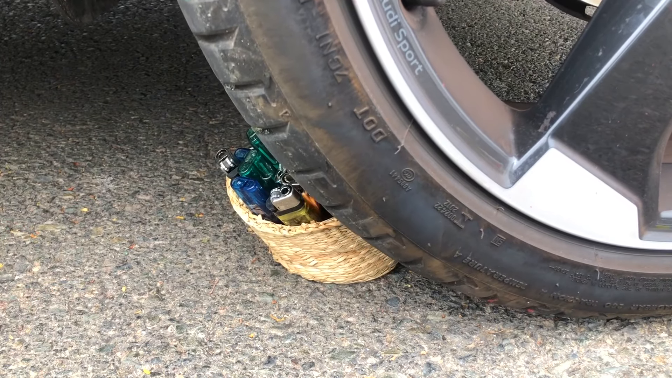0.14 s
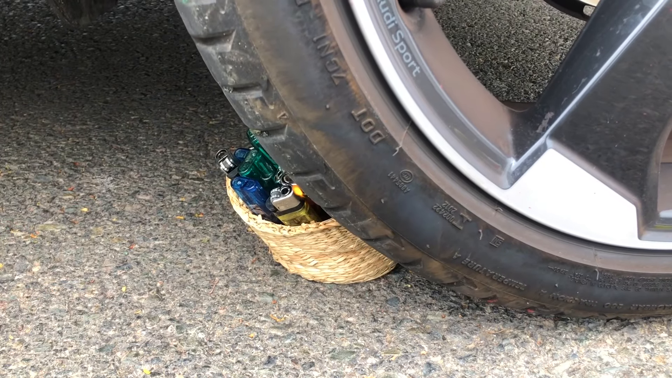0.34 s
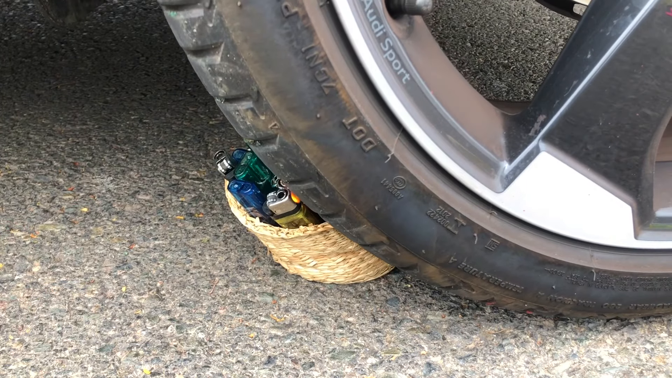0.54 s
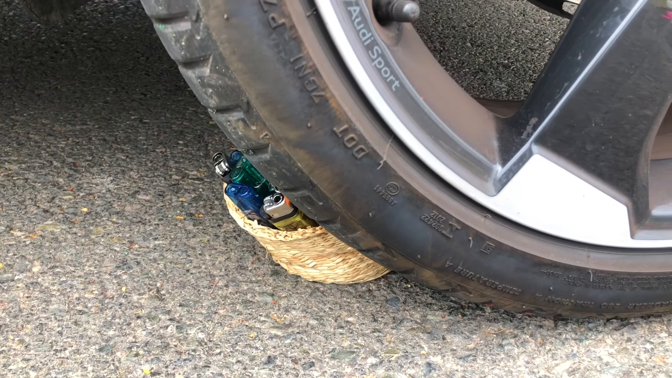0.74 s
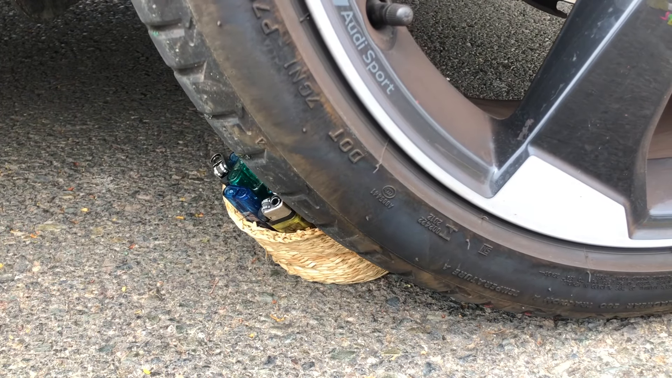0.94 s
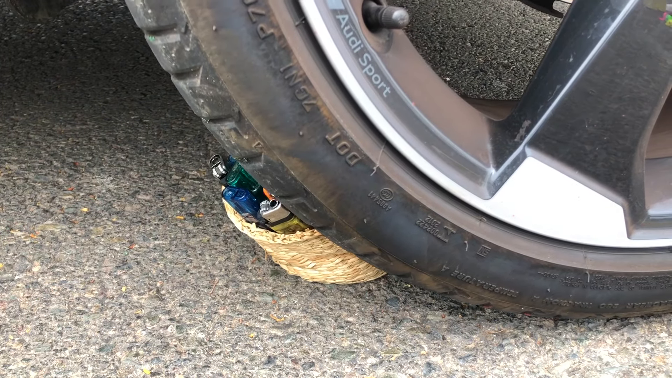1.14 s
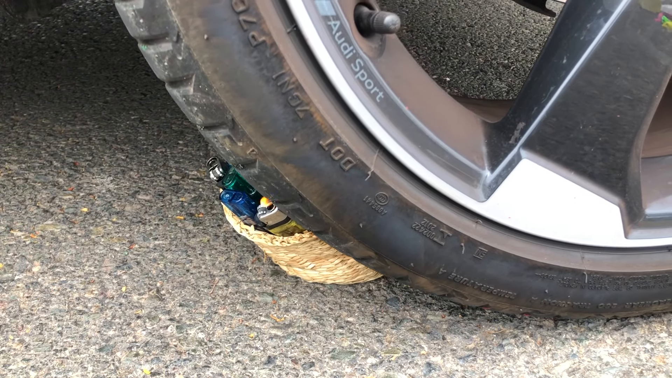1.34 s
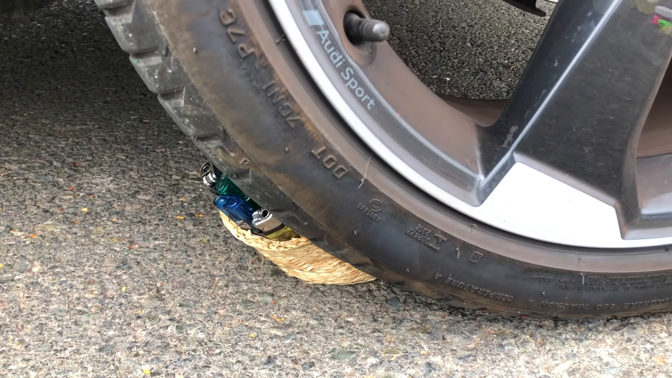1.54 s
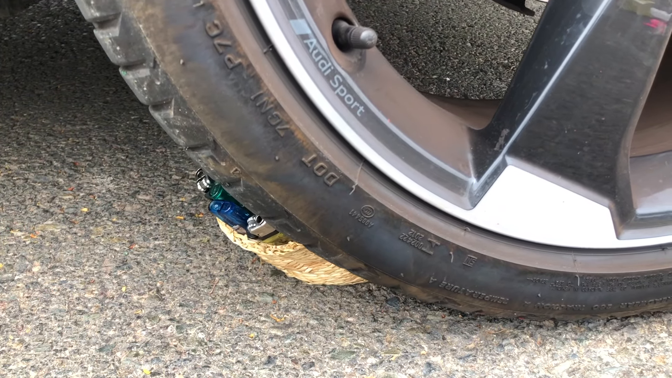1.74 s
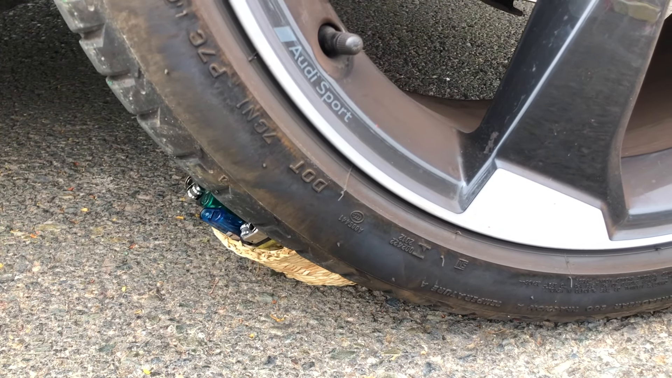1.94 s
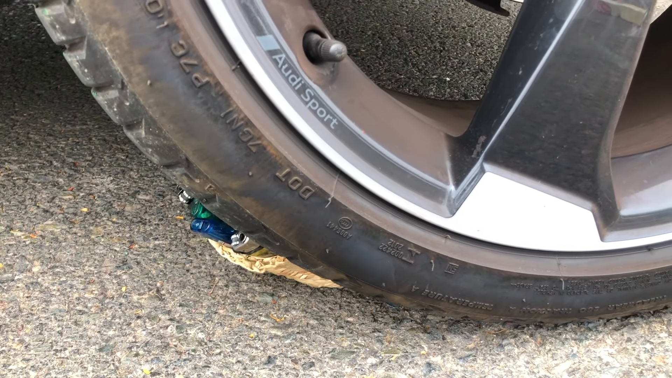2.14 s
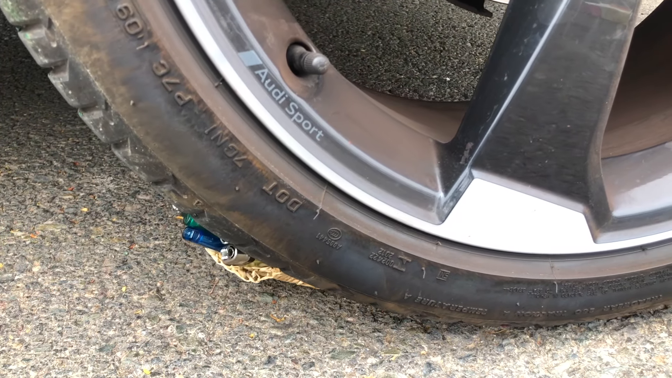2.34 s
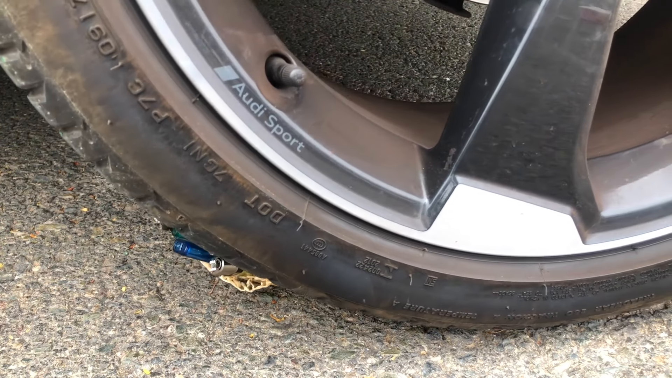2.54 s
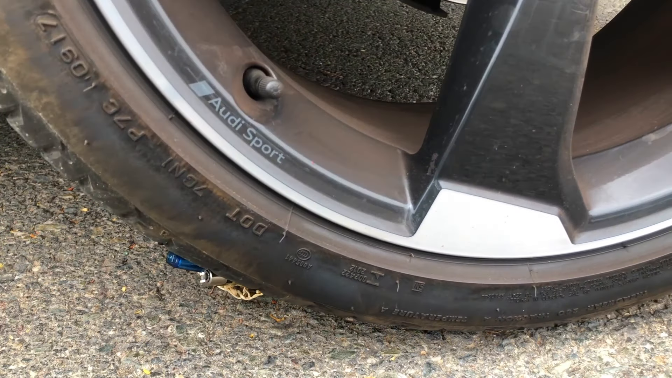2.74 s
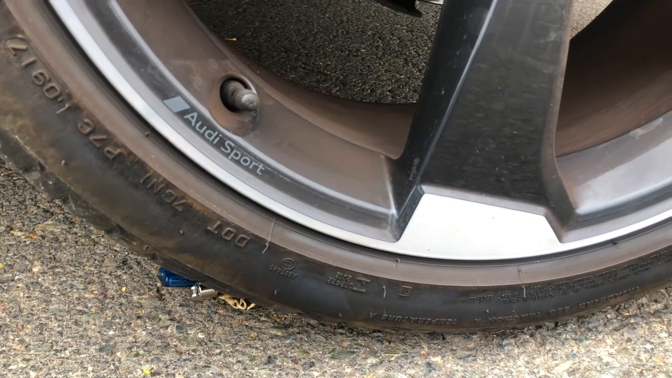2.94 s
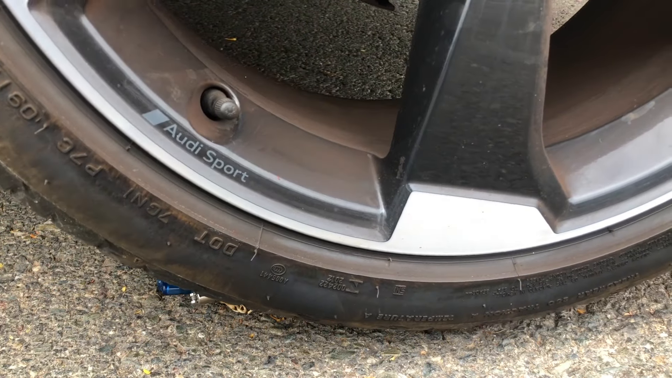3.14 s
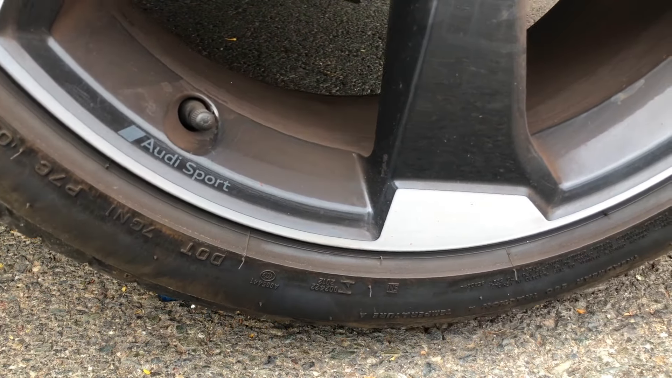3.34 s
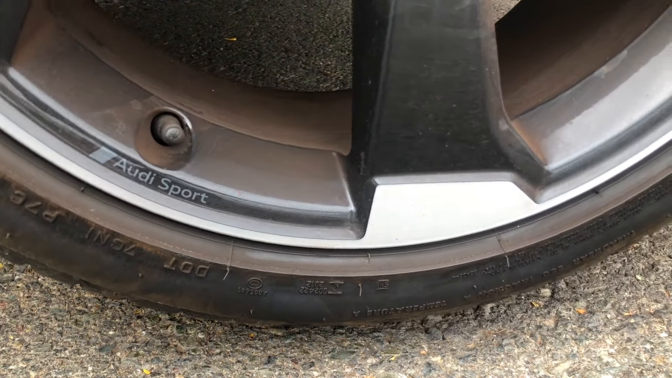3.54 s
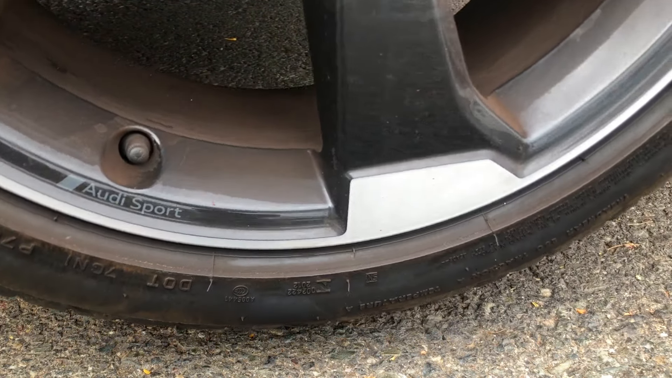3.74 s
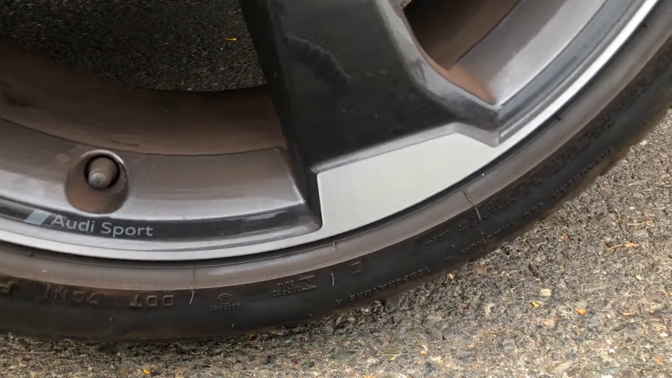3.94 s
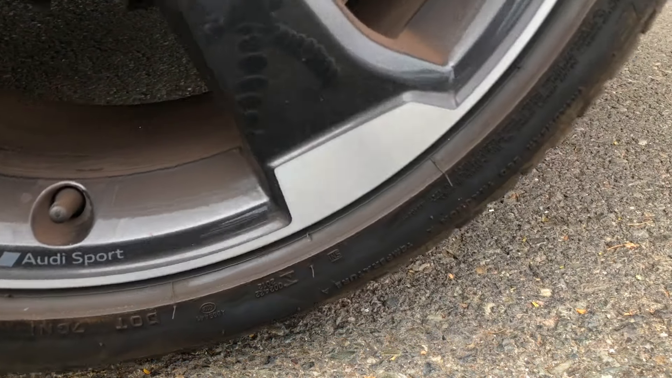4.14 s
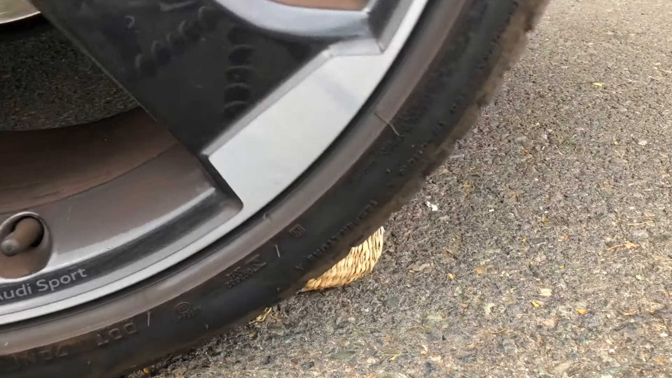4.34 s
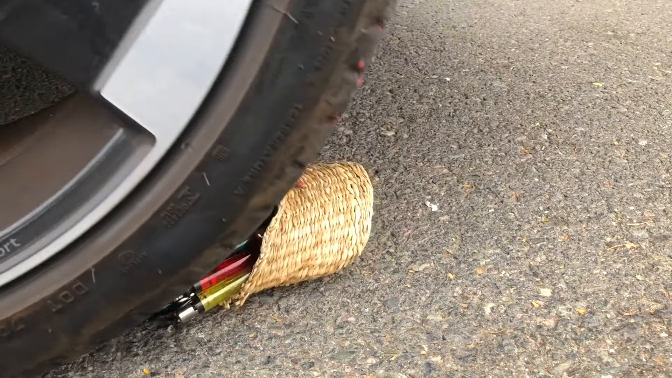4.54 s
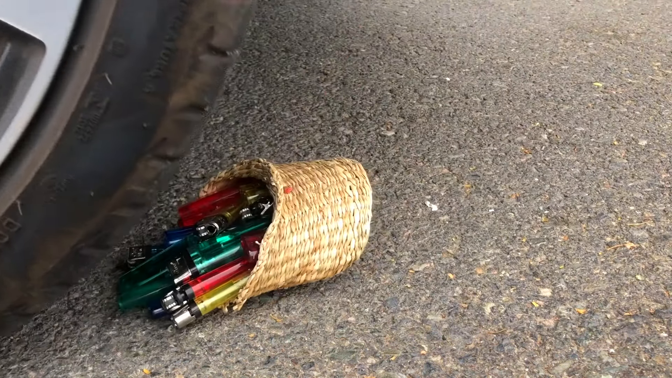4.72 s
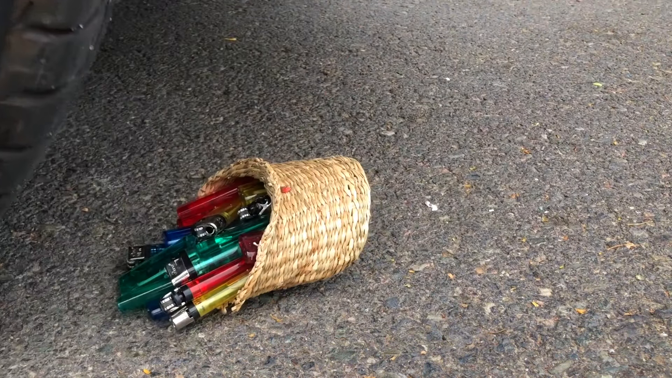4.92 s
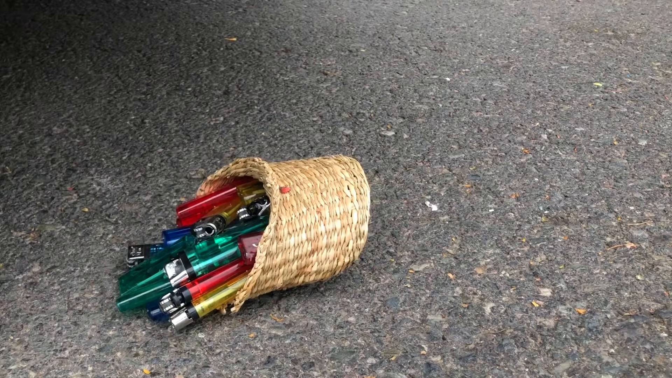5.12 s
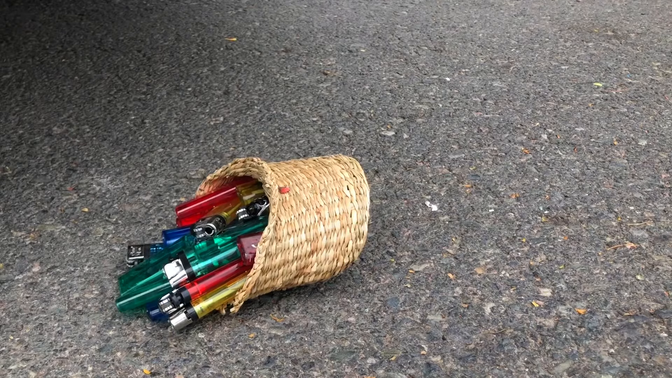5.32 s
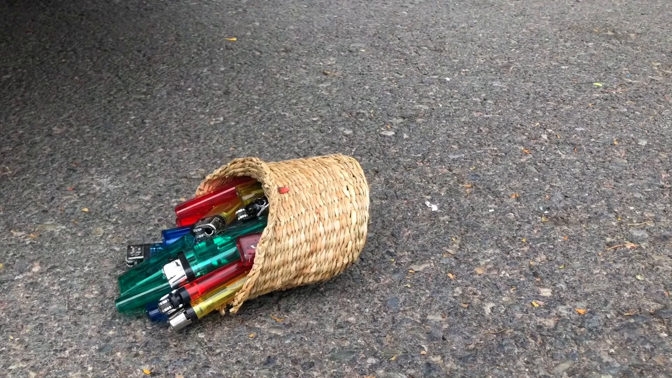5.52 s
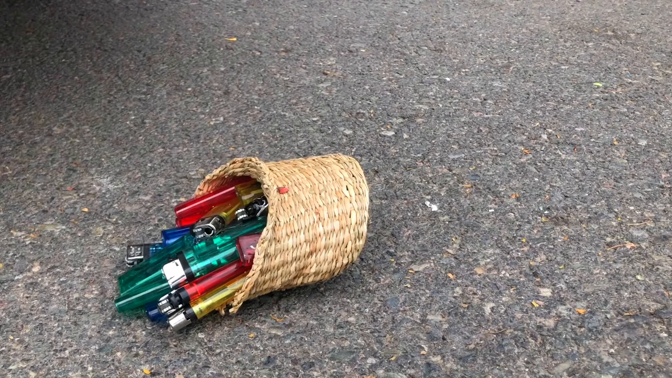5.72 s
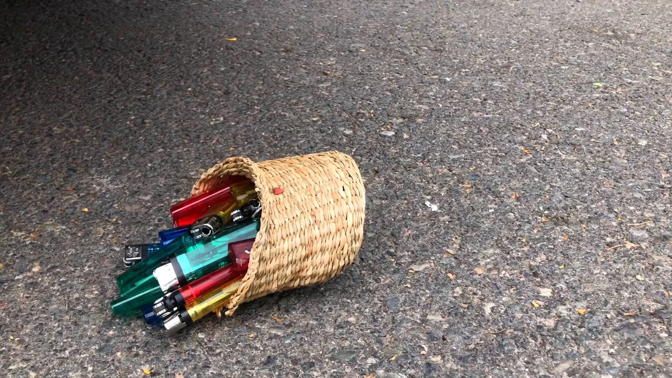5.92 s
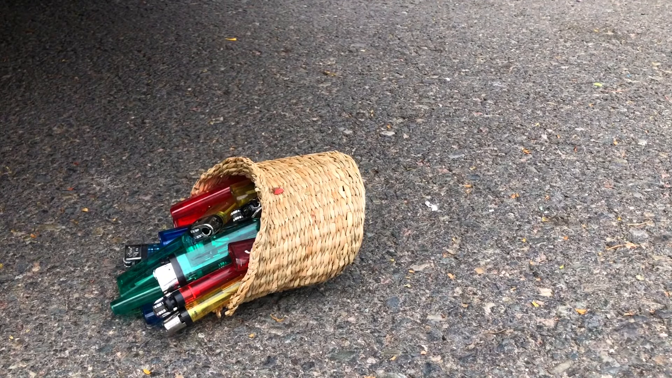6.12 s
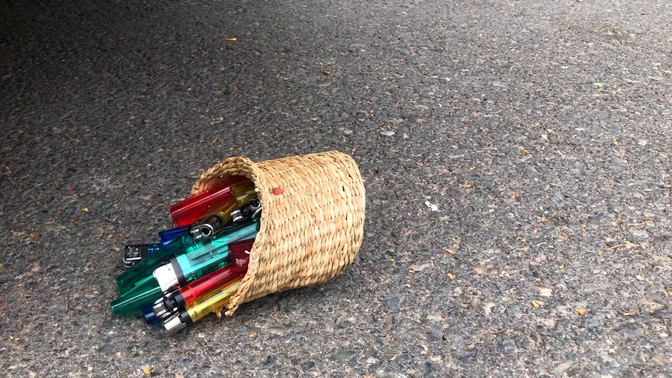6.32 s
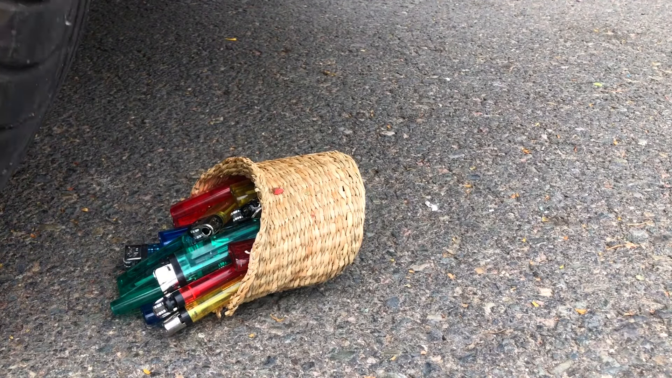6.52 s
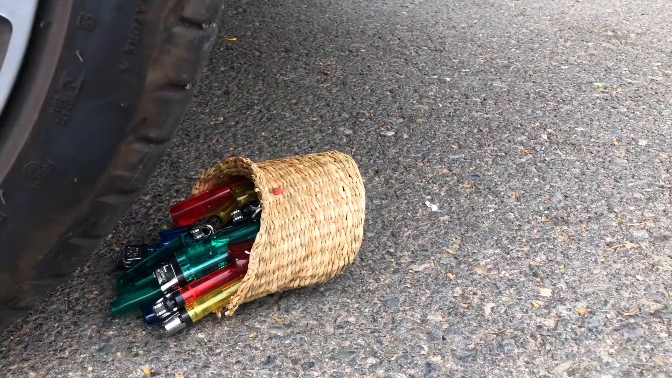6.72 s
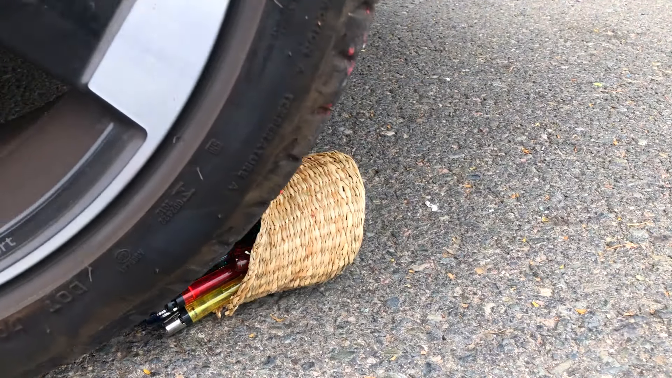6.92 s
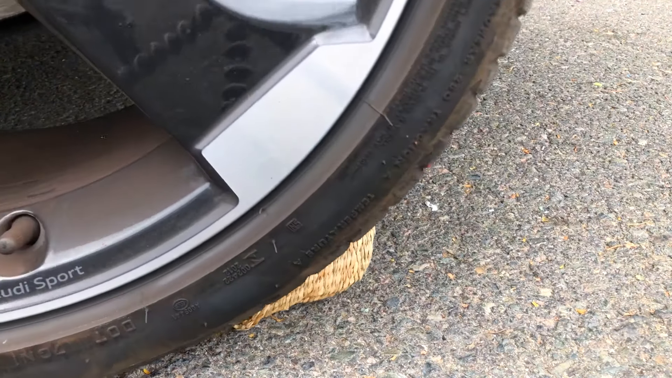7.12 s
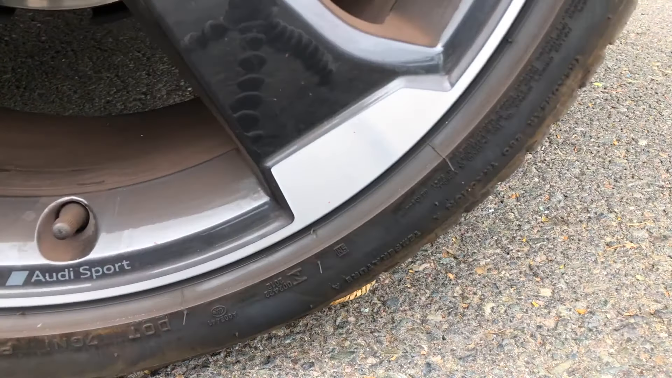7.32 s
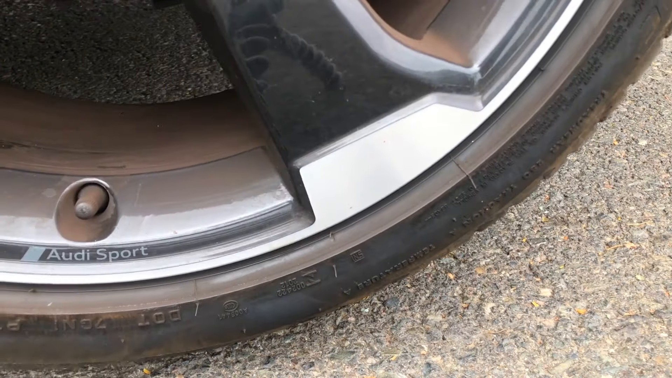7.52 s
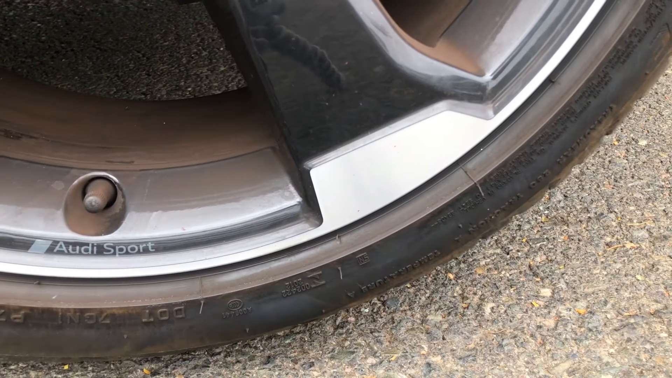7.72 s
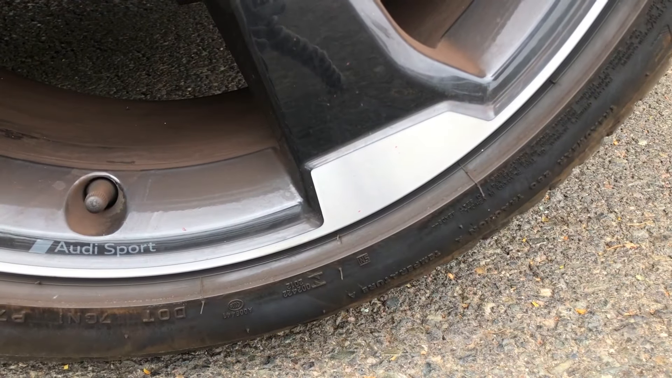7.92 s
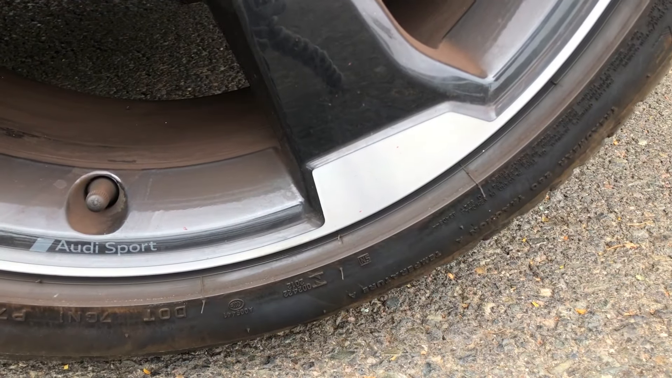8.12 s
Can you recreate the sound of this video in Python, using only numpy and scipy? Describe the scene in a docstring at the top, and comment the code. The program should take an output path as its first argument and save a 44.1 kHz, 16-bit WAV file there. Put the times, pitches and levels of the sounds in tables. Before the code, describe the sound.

A car tyre rolls slowly over a wicker basket of plastic lighters, with sharp cracks and dense crunching over a low engine, then backs on again.

```python
"""An engine idles under a faint street hiss, then revs as the car creeps over a wicker basket of plastic
lighters on asphalt; it rolls clear, then backs onto the pile again.
Engine: wavering firing orders plus coloured noise. Crushing: random splinter bursts and small falling knocks.
Cracks: placed noise snaps and knocks falling in pitch. Lurches: low noise shudders; wheel modes ring when jarred."""
import sys
import numpy as np
from scipy import signal
from scipy.io import wavfile

SR = 44100
rng = np.random.default_rng(int(sys.argv[2]) if len(sys.argv) > 2 else 0)


def dump(signal):
    """Clip the signal to [-1, 1] and save it as 16-bit WAV at the path in sys.argv[1]."""
    limited = np.clip(np.atleast_2d(signal).T, -1, 1)
    pcm = np.round(limited * 32767).astype(np.int16)
    wavfile.write(sys.argv[1], SR, pcm)


N = 364707

# engine course: t/s, firing cycle f/Hz, tone level/dB, rumble level/dB, hiss level/dB
ENGINE_COURSE = [(0, 29.8, -49, -51.5, -48.5), (.5, 35.98, -51.5, -42, -48.5),
                 (.95, 42.8, -48.5, -41.5, -46), (1.9, 44, -41.5, -42.5, -46.5),
                 (2.5, 44.16, -53.5, -42, -67), (3.1, 35.47, -47, -46.5, -55), (4.0, 31.37, -42, -37, -48),
                 (4.95, 33.15, -53, -54.5, -62.5), (5.7, 30.7, -56, -66.5, -70.5),
                 (5.9, 31.9, -52.5, -66, -69), (6.7, 28.52, -60, -49.5, -57.5),
                 (7.2, 31.13, -50, -42.5, -65), (7.95, 28.2, -52.5, -80, -59),
                 (8.27, 24.9, -68, -50.5, -58)]
# firing orders: multiple of the firing cycle, level/dB
FIRING_ORDERS = [(1, -26), (2, -3.5), (3, -2), (4, -9), (5, -8), (6, -17)]
# engine rumble spectrum: f/Hz, relative level per Hz/dB
RUMBLE_SPECTRUM = [(22, -26), (43, -5.5), (66, 1), (123, -4), (200, -5.5), (1500, -35.5)]
# fan and street hiss spectrum: f/Hz, relative level per Hz/dB
HISS_SPECTRUM = [(300, 2), (800, -8), (2000, -12), (5000, -14.5), (9000, -23), (18000, -21)]
# steady crackle under tread pressure: t/s, splinter level/dB, wicker crunch level/dB
PRESSURE_COURSE = [(0.5, -61, -54), (1.2, -54.5, -54), (1.6, -40.5, -44.5), (2.2, -46, -46),
                   (2.75, -39, -48.5), (3.05, -54.5, -45), (3.4, -46.5, -51), (3.7, -49, -38),
                   (4.75, -41.5, -44.5), (4.93, -48, -48.5), (5.05, -93, -72), (6.38, -81, -66.5),
                   (6.55, -62, -50), (6.95, -48.5, -53), (7.2, -44.5, -36), (7.38, -53, -57),
                   (7.95, -65, -65), (8.12, -72, -63)]
# partial collapses of the pile: start t/s, length/s, splinter level/dB, crunch level at 1 kHz/dB,
# crunch tilt/(dB per octave)
COLLAPSE_EVENTS = [(1.455, 0.016, -42, -25, 9), (1.694, 0.11, -36.5, -41.5, 7.5),
                   (1.981, 0.15, -36.5, -39.5, -1.5), (2.132, 0.072, -31, -36, 7.5),
                   (2.392, 0.085, -36, -38.5, 1), (2.516, 0.15, -38.5, -45.5, 8),
                   (2.855, 0.045, -30, -32.5, 5), (3.147, 0.047, -30.5, -38, -6.5),
                   (3.436, 0.04, -32, -39.5, -1), (3.507, 0.027, -34.5, -33.5, -6),
                   (3.575, 0.038, -34.5, -47.5, -23), (3.697, 0.088, -33.5, -87, 4.5),
                   (3.93, 0.1, -33, -32, 3), (4.086, 0.29, -49.5, -38, 1.5),
                   (4.439, 0.12, -32, -44.5, 14.5), (4.625, 0.079, -37, -55, -5),
                   (6.715, 0.093, -55, -48.5, 8), (7.145, 0.046, -49, -55, 20.5),
                   (7.293, 0.04, -49, -27, 3), (7.934, 0.043, -34.5, -35, -2)]
# plastic splinter spectrum: f/Hz, relative level per Hz/dB
SPLINTER_SPECTRUM = [(1000, -41), (2500, -4), (6300, 4.5), (10000, 2), (18000, 1)]
# clearest single cracks: t/s, snap level/dB, knock level/dB, knock f/Hz
CRACK_EVENTS = [(0.5479, -17, -13.5, 960), (0.5693, -22.5, -18, 750), (0.6299, -28, -21.5, 950),
                (0.7083, -20.5, -47, 600.0), (0.838, -23.5, -29, 1350), (0.8605, -17, -15, 745),
                (0.9296, -27.5, -33, 1500.0), (1.1182, -33, -50, 786), (1.151, -33, -40.5, 630.0),
                (1.2475, -29, -41, 630.0), (1.2588, -16, -24.5, 1200), (1.314, -13.5, -14, 1600),
                (1.3985, -14.5, -29.5, 832), (1.4037, -19, -32, 1420), (1.414, -15, -17.5, 1600),
                (1.467, -7, -14.5, 610), (1.4856, -19, -10.5, 1160), (1.52, -10.5, -12.5, 784),
                (1.5574, -13, -20, 1600), (1.6278, -17, -17.5, 651), (1.6364, -18, -19, 760),
                (1.6959, -13, -8, 1160), (1.7368, -13.5, -24, 1120.0), (1.7506, -16, -14.5, 653),
                (1.7653, -15.5, -30, 1300.0), (1.773, -14.5, -19, 1230.0), (1.7792, -19.5, -15, 930.0),
                (1.7992, -25.5, -11, 1600), (1.808, -19.5, -28.5, 1730.0), (1.8232, -13.5, -19, 684),
                (1.8556, -11.5, -13, 1550), (1.9131, -12, -17.5, 750), (1.929, -26, -19, 1350),
                (1.998, -14, -16.5, 684), (2.008, -15.5, -22.5, 730.0), (2.022, -25, -14, 820),
                (2.048, -10, -16, 675), (2.0912, -16.5, -26, 772), (2.123, -18, -30, 885),
                (2.164, -21, -9.5, 1370), (2.206, -17.5, -14, 790), (2.271, -21.5, -29, 660),
                (2.3365, -20, -22.5, 640), (2.3998, -27, -25, 805), (2.414, -17, -14.5, 1550),
                (2.488, -18.5, -33, 690.0), (2.511, -28, -13, 1180), (2.5569, -17, -22.6, 655),
                (2.5639, -25, -13, 800), (2.65, -27, -19.5, 770), (2.6911, -28.5, -23, 730.0),
                (2.7315, -30, -20, 1170), (2.7671, -23, -22.5, 804), (2.8214, -23, -16, 618),
                (2.8399, -18, -18, 860), (2.8526, -22, -22, 880.0), (2.8656, -25, -12.5, 980),
                (2.8783, -13, -8, 830), (2.8954, -24, -10.5, 900), (2.9139, -33, -16.5, 845),
                (2.931, -35, -21, 850), (2.9406, -23.5, -19, 634), (2.954, -25, -20, 840),
                (2.9707, -24, -26, 1210), (2.9757, -39, -20.5, 890), (3.0042, -39.5, -22, 720),
                (3.039, -36.5, -21.5, 635), (3.0745, -34, -20, 623), (3.1022, -32, -23, 865),
                (3.1265, -16.5, -27, 760), (3.167, -20, -18.5, 740), (3.2101, -22.5, -10, 840.0),
                (3.2531, -26, -20, 770), (3.301, -25, -16.5, 624), (3.3918, -25, -15.5, 714),
                (3.447, -31, -12, 990), (3.4508, -17.5, -15.5, 800), (3.5093, -15.5, -11.5, 790),
                (3.5418, -21.5, -20, 596), (3.5855, -11, -8.5, 785), (3.6197, -19, -29, 1020.0),
                (3.646, -18, -15.5, 830), (3.6771, -18.5, -18.5, 1280), (3.7, -28, -19, 820),
                (3.7407, -17.5, -29, 730.0), (3.7564, -27, -17.5, 870), (3.7794, -21, -20, 872),
                (3.8036, -18.5, -15, 930.0), (3.8543, -15.5, -11.5, 1680), (3.869, -20, -32.6, 1570.0),
                (3.9012, -22.5, -22, 1080), (3.909, -13, -9.5, 800), (3.9412, -19, -12.5, 890),
                (3.945, -25.5, -16, 670), (3.9648, -15, -33, 690.0), (3.986, -14, -15, 604),
                (4.1053, -21, -13.5, 600.0), (4.1277, -22, -3, 1310), (4.1443, -23, -13, 925),
                (4.1687, -18.5, -10, 1210), (4.1823, -21, -20, 900), (4.1856, -22, -17, 1100),
                (4.199, -33, -19, 1300), (4.1916, -24, -12, 605), (4.213, -22, -13.5, 726),
                (4.2312, -22.5, -8, 1380), (4.2429, -33, -15, 950), (4.2494, -33, -15, 1010),
                (4.269, -39, -17.5, 900), (4.3018, -31, -21, 800), (4.259, -28, -13, 730.0),
                (4.2825, -18, -5, 690.0), (4.318, -17.5, -30, 1180.0), (4.327, -25, -26, 1300.0),
                (4.3408, -18, -36, 600.0), (4.36, -21, -23, 600.0), (4.3788, -20, -17, 600.0),
                (4.394, -19.5, -15, 1230.0), (4.4346, -23, -15.5, 630.0), (4.4526, -39, -12.5, 1440),
                (4.475, -28, -10, 1500), (4.4885, -31, -19, 2000), (4.498, -19.5, -19, 1650.0),
                (4.512, -22, -14, 1830), (4.537, -21, -20, 930.0), (4.5543, -20.5, -28, 1213),
                (4.574, -20, -19, 1070.0), (4.611, -21.5, -21, 730.0), (4.6324, -24, -8.5, 725),
                (4.6394, -40, -16, 680), (4.661, -21.5, -28, 1500), (4.692, -22.5, -23.5, 607),
                (4.7202, -18, -35, 735), (4.7745, -26, -13, 900), (4.7889, -17.5, -16, 860),
                (4.8285, -18.5, -17.5, 608), (4.956, -53, -23.5, 940), (4.9675, -36.5, -32, 756),
                (6.294, -51, -35, 1357), (6.5105, -34, -32, 1650), (6.5204, -28.5, -32, 805),
                (6.5664, -32.5, -43, 760.0), (6.5912, -14.5, -28, 750), (6.6244, -31, -35, 1300.0),
                (6.659, -29.5, -15, 1090), (6.6987, -32, -5, 1230), (6.7242, -22, -23.1, 830),
                (6.7506, -13, -19.5, 870), (6.7835, -25, -27, 1415), (6.804, -14.5, -25, 1403),
                (6.8103, -23.5, -18, 1160), (6.84, -26.5, -22, 1030), (6.8759, -35, -23, 1020.0),
                (6.9135, -26.5, -27, 802), (6.985, -17, -49, 1664), (7.0339, -29, -23, 850),
                (7.0503, -24.5, -21.5, 1173), (7.067, -19, -25, 1410), (7.1236, -23, -24, 880.0),
                (7.157, -38, -22, 1300), (7.247, -44, -19, 1530), (7.277, -30, -24, 1500),
                (7.3235, -31, -12, 1100), (7.1802, -20.5, -9.5, 1270), (7.189, -18.5, -15, 915),
                (7.2089, -16.5, -11.5, 1150), (7.2896, -20.5, -2.5, 850), (7.311, -25, -15, 799),
                (7.407, -31.5, -48, 944), (7.5502, -40, -27.5, 803), (7.6045, -33, -39, 630.0),
                (7.7045, -33, -37, 1203), (7.8023, -32, -27.5, 1314), (7.898, -35, -56, 930.0),
                (7.9265, -19.5, -9, 960), (7.9412, -19.5, -6.5, 594), (7.9614, -22, -33, 597)]
# tyre lurches as the pile gives way: t/s, shudder level/dB, shudder f/Hz, shudder length/s, wheel blow level/dB
LURCH_EVENTS = [(0.604, -35, 84, 0.097, -58), (0.714, -32.5, 71.5, 0.13, -54),
                (1.276, -29.5, 158, 0.043, -52), (1.474, -34, 220, 0.043, -56),
                (2.207, -30.5, 193, 0.055, -37), (2.421, -30.5, 151, 0.062, -48),
                (2.691, -35, 109, 0.039, -64), (3.946, -29, 232, 0.037, -36.5),
                (4.444, -31.5, 245, 0.17, -40.5), (7.152, -35, 245, 0.12, -63),
                (7.284, -22.5, 265, 0.019, -47), (7.962, -32.5, 264, 0.037, -26.5)]
# rim and tyre modes: f/Hz, level/dB, t60/s
WHEEL_MODES = [(210, -9, .35), (404, -11, .22), (549, -8, .3), (619, 0, .26), (711, -16, .25),
               (775, -17, .15), (899, -15, .3), (953, -13, .25), (985, -15, .25)]

COLLAPSE_RISE_S, COLLAPSE_FADE_S = 0.016, 0.014
SNAP_HZ, SNAP_SPREAD_OCT = 5300, 0.4   # shards differ in size, hence in pitch
KNOCK_INTO_WHEEL_DB = -33.5   # every knock also jars the wheel
CUTOFF_HZ = 15800


def from_db(db):
    """Level in dB to amplitude ratio."""
    return 10 ** (np.asarray(db) / 20)


def rms_one(x):
    """Scale to rms 1."""
    return x / np.sqrt(np.mean(x ** 2) + 1e-20)


def in_time(rows):
    """Columns of a course table, interpolated per sample."""
    t_s, *columns = np.transpose(rows)
    return [np.interp(np.arange(N) / SR, t_s, column) for column in columns]


def band_pass(order, low_hz, high_hz, output="ba"):
    """Butterworth band-pass coefficients."""
    return signal.butter(order, [low_hz, high_hz], "band", fs=SR, output=output)


def colour(x, spectrum):
    """Parallel half-octave band-passes, each at its spectrum level; rms 1."""
    hz, level_db = np.transpose(spectrum)
    edges_hz = 20 * 2 ** np.arange(0, 10.1, .5)
    out = 0
    for k, (low_hz, high_hz) in enumerate(zip(edges_hz, edges_hz[1:])):
        log_centre = np.log(low_hz * high_hz) / 2
        gain = from_db(np.interp(log_centre, np.log(hz), level_db, -90, -90))
        band = signal.sosfilt(band_pass(2, low_hz, high_hz, "sos"), x)
        out = out + (-1) ** k * gain * band
    return rms_one(out)


def drift(rate_hz):
    """Slow random wander: noise through a double one-pole low-pass; rms 1."""
    r = np.exp(-2 * np.pi * rate_hz / SR)
    slow = signal.lfilter([1], [1, -2 * r, r * r], rng.standard_normal(N + SR))
    return rms_one(slow[SR:])   # first second dropped: filter settling


def add(out, t_s, x):
    """Mix x into out from t_s."""
    i = round(t_s * SR)
    out[i:i + len(x)] += x[:N - i]


def grains(per_s, spread_db, clump_db):
    """Random clicks of very uneven size, in clumps."""
    sizes = from_db(spread_db * np.minimum(rng.exponential(1, N), 4)) * rng.choice([-1, 1], N)
    return sizes * (rng.random(N) < per_s * from_db(clump_db * drift(40.)) / SR)


def splinters(per_s, spread_db, clump_db):
    """Crackle envelope: each splinter decays in about a millisecond."""
    clicks = np.abs(grains(per_s, spread_db, clump_db))
    return signal.lfilter([1], [1, -np.exp(-1 / (.0012 * SR))], clicks)


def engine(waver_db, patchy_db):
    """Low firing orders as wavering tones over a lumpy rumble, with fan and street hiss."""
    cycle_hz, tone_db, rumble_db, hiss_db = in_time(ENGINE_COURSE)
    turns = np.cumsum(cycle_hz) / SR
    load_db = 0.88 * (cycle_hz - 30)   # revving favours the lowest orders
    tones = 0
    for k, level_db in FIRING_ORDERS:
        level = from_db(level_db - (k - 3.0) * load_db + waver_db * drift(7.2))
        tones = tones + level * np.sin(2 * np.pi * (k * turns + rng.random()))
    rumble = colour(rng.standard_normal(N), RUMBLE_SPECTRUM) * from_db(patchy_db * drift(4.6))
    grit = splinters(14., 4., 2)   # loose grit and shards tick now and then
    hiss = colour((1 + grit) * rng.standard_normal(N), HISS_SPECTRUM)
    return from_db(tone_db) * tones + from_db(rumble_db) * rumble + from_db(hiss_db) * hiss


def falling_ring(hz, cycles, t):
    """Bending waves outrun each other, high part first: pitch falls through hz in a few cycles."""
    turns = hz * t
    swell = turns * np.exp(-(turns / cycles) ** 2)
    return swell * np.sin(2 * np.pi * (0.64 * turns + 1.587 * (1 - np.exp(-turns))))


def collapses():
    """Envelope of each collapse, one per row: quick swell, hold, exponential fade."""
    start_s, length_s = np.transpose(COLLAPSE_EVENTS)[:2, :, None]
    t = np.arange(N) / SR - start_s
    return np.clip(t / COLLAPSE_RISE_S, 0, 1) * np.exp(-np.maximum(t - length_s, 0) / COLLAPSE_FADE_S)


def crushing():
    """Dense small fractures: bright plastic splinters as noise bursts, duller wicker snaps as falling knocks."""
    splinter_db, crunch_db = in_time(PRESSURE_COURSE)
    *_, burst_splinter_db, burst_crunch_db, tilt_db = np.transpose(COLLAPSE_EVENTS)
    shapes = collapses()

    large, small = (splinters(230., 2.8, 4.5) * rng.standard_normal(N) for _ in range(2))
    # larger shards sound darker: sum of neighbouring samples against their difference
    shards = signal.lfilter([1, 1], 1, large) + signal.lfilter([1, -1], 1, small)
    bright = colour(shards + 1e-18, SPLINTER_SPECTRUM)

    clicks, pitches_hz = grains(850., 3.5, 4.5), np.geomspace(480, 2600, 12)
    dealt = rng.integers(0, len(pitches_hz), N)   # each click gets one pitch
    t = np.arange(SR // 50) / SR
    rings = np.array([signal.oaconvolve(clicks * (dealt == k), falling_ring(hz, cycles=1.67, t=t))[:N]
                      for k, hz in enumerate(pitches_hz)])
    pitch_tilt_db = np.outer(np.log2(pitches_hz / 1000), tilt_db)
    tilted = from_db(burst_crunch_db + pitch_tilt_db) @ shapes
    dull = np.sum((from_db(crunch_db) + tilted) * rings, axis=0) / np.std(rings.sum(axis=0))
    return (from_db(splinter_db) + from_db(burst_splinter_db) @ shapes) * bright + dull


def cracks(snap_s, tail_s, tail_db, rattle_db):
    """Each fracture: bright burst with scatter tail, plus a dull shell knock with ragged after-rattle."""
    out, t = np.zeros(N), np.arange(2048) / SR
    count = len(CRACK_EVENTS)
    noise = rng.standard_normal((count, 2, len(t)))
    jerks = from_db(rng.normal(0, 4., (count, 32)))   # the break runs in jerks
    noise[:, 0] *= np.repeat(jerks, 64, axis=1)
    shards_hz = SNAP_HZ * 2 ** (SNAP_SPREAD_OCT * np.clip(rng.standard_normal(count), -2, 2))
    for (t_s, snap_db, knock_db, knock_hz), (hiss, rough), shard_hz in zip(CRACK_EVENTS, noise, shards_hz):
        burst = hiss * (t / snap_s * np.exp(1 - t / snap_s) + from_db(tail_db) * np.exp(-t / tail_s))
        burst[0] += 1.5 * np.sign(hiss[0])   # the first break is one hard edge
        band = band_pass(1, shard_hz / 1.27, min(shard_hz * 1.38, .45 * SR))
        snap = signal.lfilter(*band, burst) + 0.37 * np.diff(burst, prepend=0)
        add(out, t_s, from_db(snap_db) * snap / np.sqrt(np.mean(snap[:128] ** 2) * 2))

        overtone = 0.58 * falling_ring(1.92 * knock_hz, cycles=1.13, t=t)
        overtone += 0.38 * falling_ring(3.6 * knock_hz, cycles=1.3, t=t)
        fundamental = falling_ring(knock_hz, cycles=1.44, t=t)
        knock = np.sign(rough[0]) * (fundamental + np.sign(rough[1]) * overtone)
        rattle = signal.lfilter(*band_pass(2, 550, 1900), rough * np.exp(-t / tail_s))
        add(out, t_s, from_db(knock_db) * (knock + from_db(rattle_db) * rattle))
    return out


def underbody(x, level_db, t60_s):
    """Scatter between asphalt and car floor: a short tail in the low treble."""
    t = np.arange(SR // 4) / SR
    tail = signal.lfilter(*band_pass(1, 2500, 7000), rng.standard_normal(len(t))) * from_db(-60 * t / t60_s)
    return x + from_db(level_db) * signal.fftconvolve(x, tail / np.linalg.norm(tail))[:N]


def ring(clicks, hz, t60_s):
    """Two-pole resonator: a unit click starts a decaying sine of height 1."""
    r, w = from_db(-60 / (t60_s * SR)), 2 * np.pi * hz / SR
    return signal.lfilter([0, np.sin(w)], [1, -2 * r * np.cos(w), r * r], clicks + 1e-18)


def wheel(blows):
    """Rim and tyre modes rung by blows; the tread grips and lets go, so each mode flutters."""
    flutters = from_db(1.2 * np.array([drift(12.) for _ in WHEEL_MODES]))
    return sum(from_db(level_db) * flutter * ring(blows, hz, t60_s)
               for (hz, level_db, t60_s), flutter in zip(WHEEL_MODES, flutters))


def lurches():
    """Low rough shudders through the tyre; these and the knocks jar the wheel."""
    out, blows, t = np.zeros(N), np.zeros(N), np.arange(SR // 2) / SR
    noise = rng.standard_normal((len(LURCH_EVENTS), len(t)))
    for (t_s, level_db, hz, length_s, blow_db), rough in zip(LURCH_EVENTS, noise):
        shudder = rms_one(signal.sosfilt(band_pass(2, hz / 1.3, hz * 1.415, "sos"), rough))
        envelope = np.minimum(t / .01, 1) * np.exp(-(t / length_s) ** 2)
        add(out, t_s, from_db(level_db) * shudder * envelope)
        add(blows, t_s, [from_db(blow_db)])
    for t_s, _, knock_db, _ in CRACK_EVENTS:
        add(blows, t_s, [from_db(knock_db + KNOCK_INTO_WHEEL_DB) * rng.choice([-1, 1])])
    return out + wheel(blows)


def scene():
    """The crushing close by, over the engine."""
    fractures = cracks(snap_s=0.00026, tail_s=0.0052, tail_db=-8, rattle_db=-4.0) + crushing()
    near = underbody(fractures, level_db=-17.5, t60_s=0.14) + lurches()
    return (near + engine(waver_db=3, patchy_db=3))[None]


def record(dry):
    """Peaks rounded by tanh, top cut by a steep low-pass."""
    rounded = .6 * np.tanh(dry / .6)
    return signal.sosfilt(signal.ellip(12, .5, 70, CUTOFF_HZ, fs=SR, output="sos"), rounded)


dry = scene()
out = record(dry)
dump(out)
```